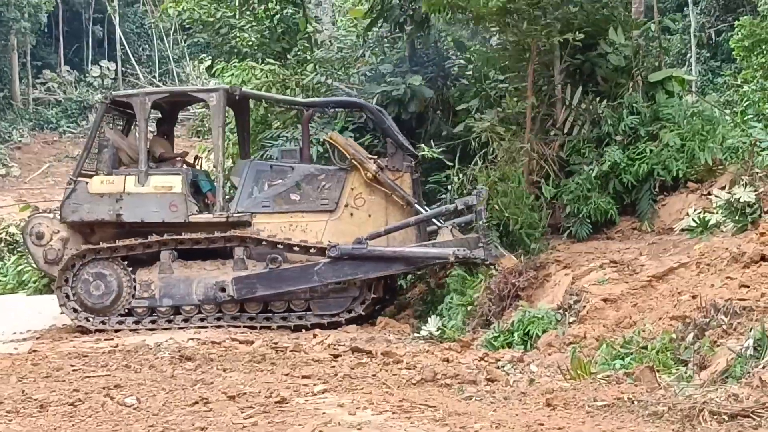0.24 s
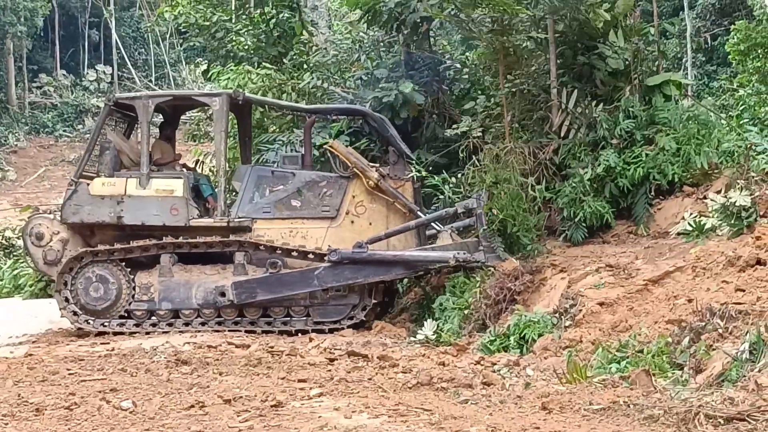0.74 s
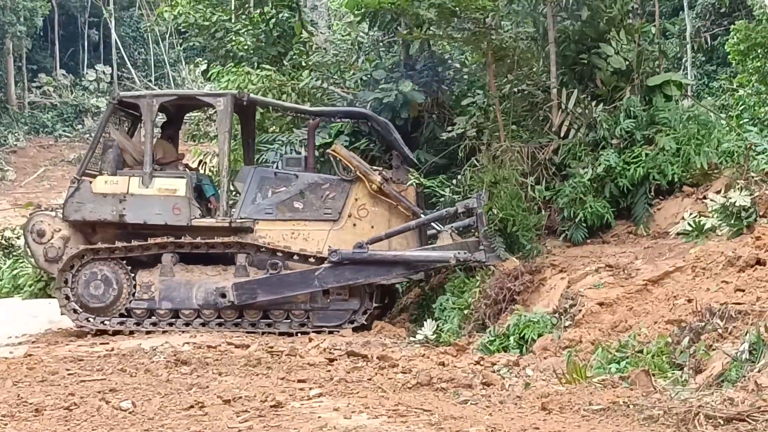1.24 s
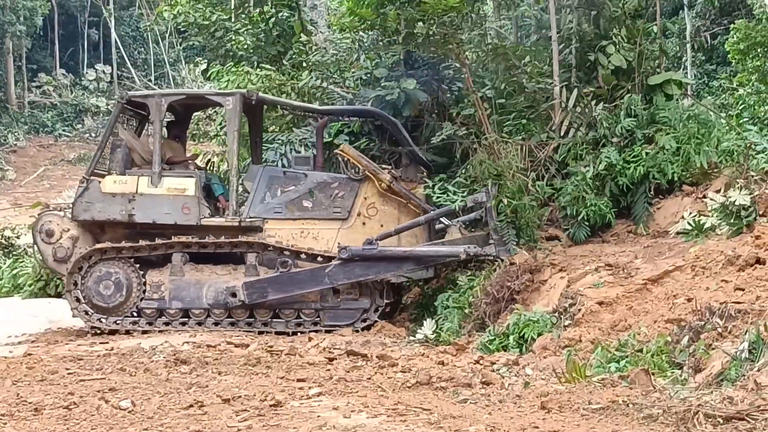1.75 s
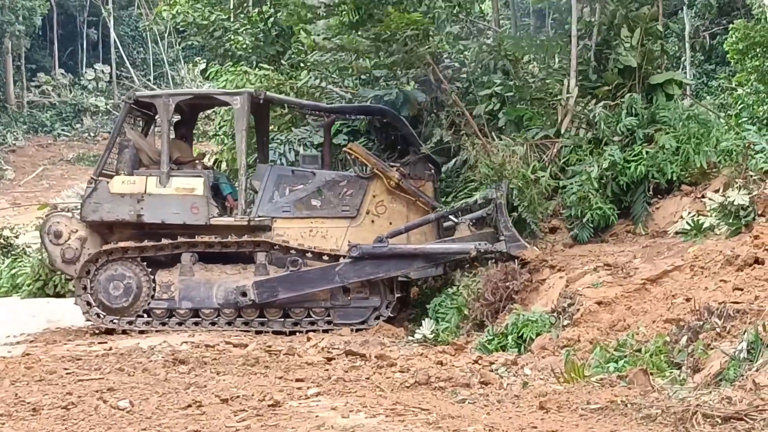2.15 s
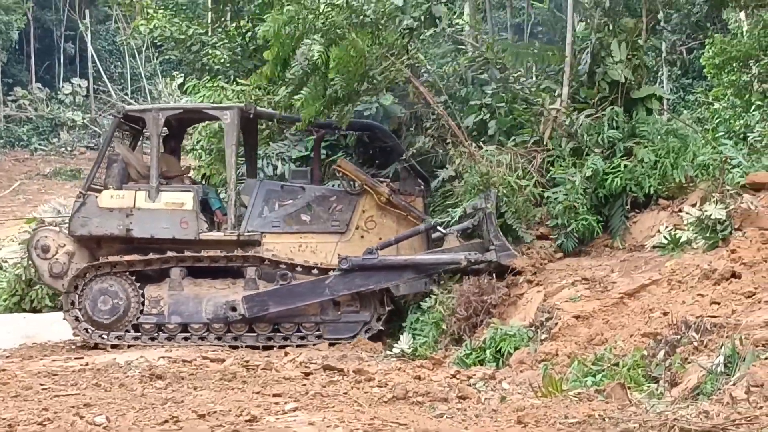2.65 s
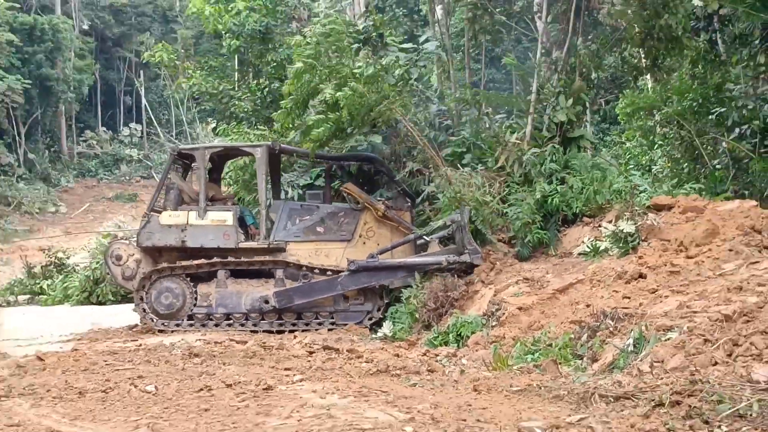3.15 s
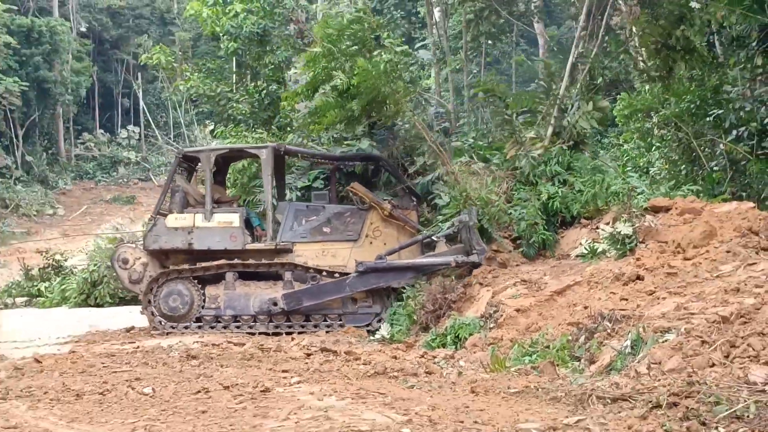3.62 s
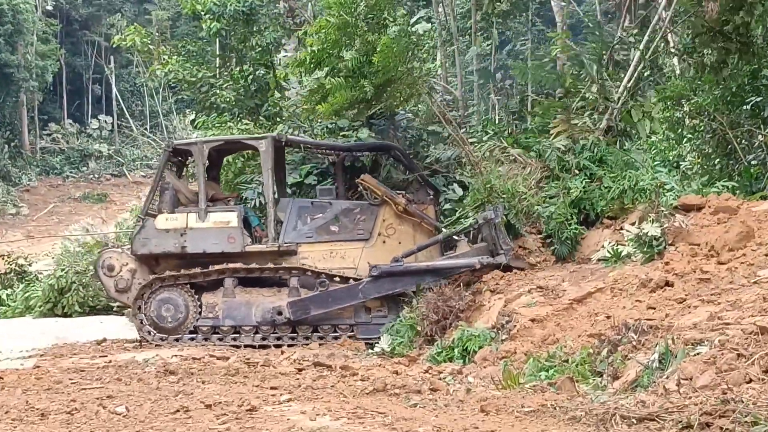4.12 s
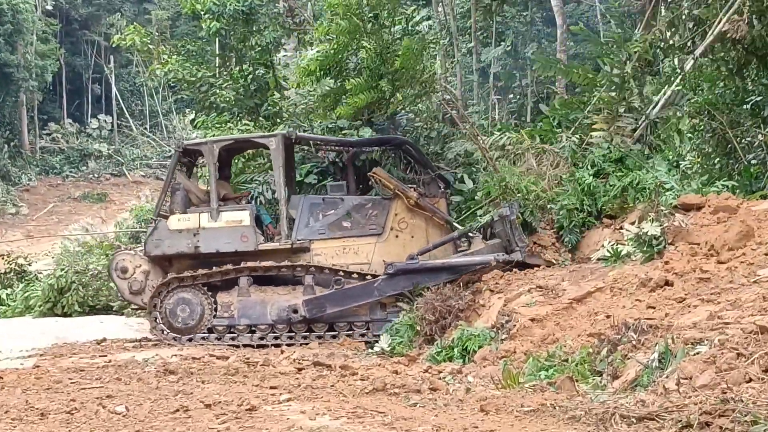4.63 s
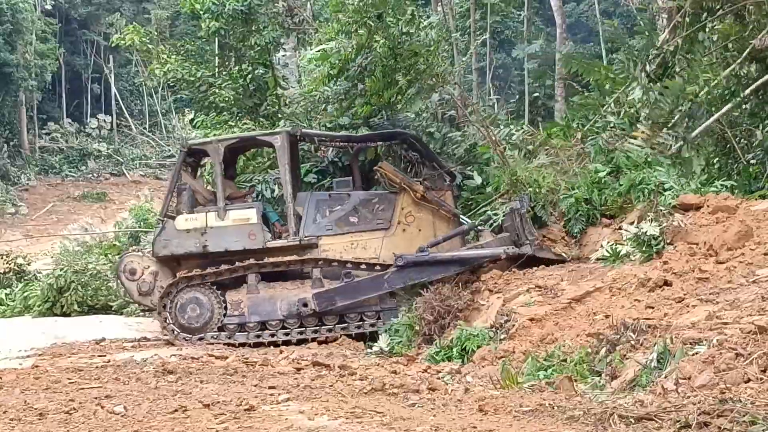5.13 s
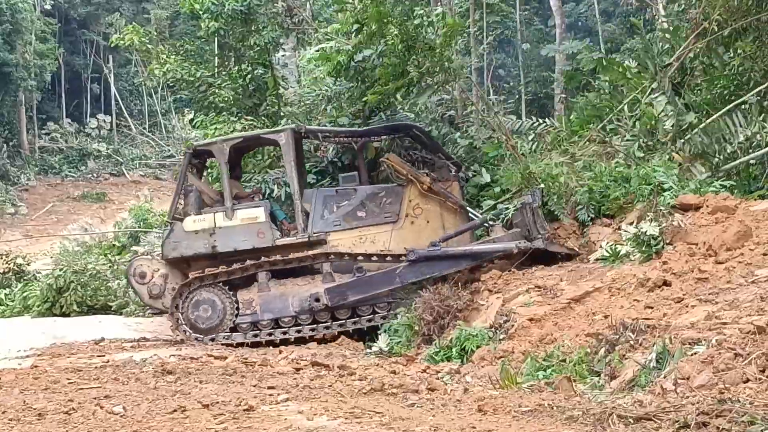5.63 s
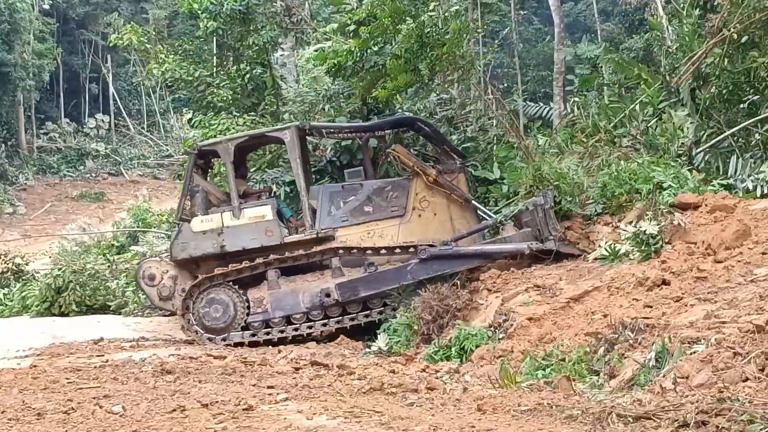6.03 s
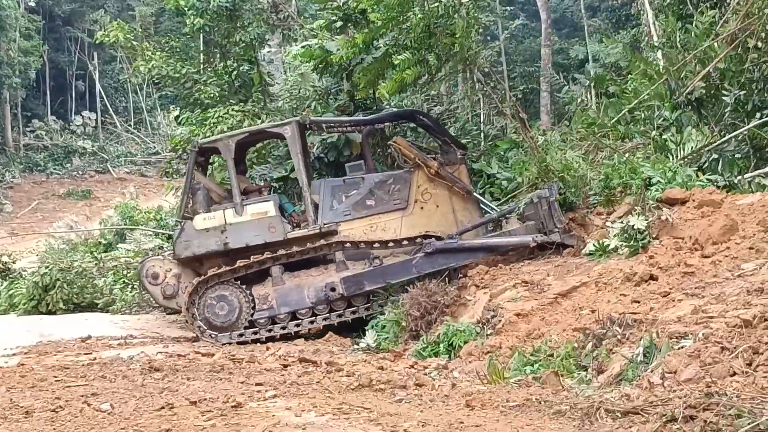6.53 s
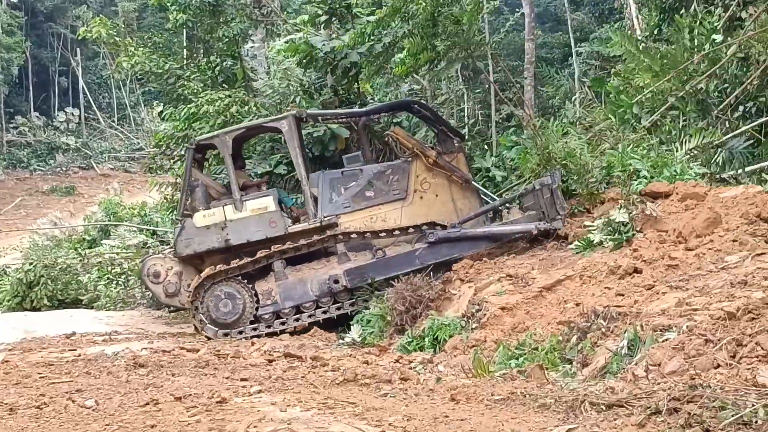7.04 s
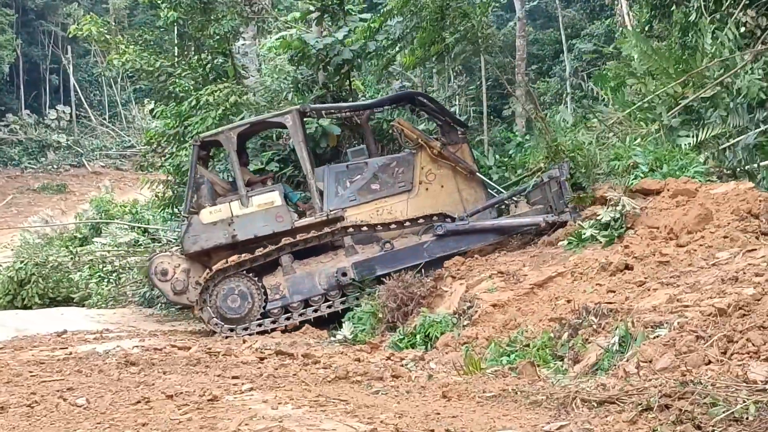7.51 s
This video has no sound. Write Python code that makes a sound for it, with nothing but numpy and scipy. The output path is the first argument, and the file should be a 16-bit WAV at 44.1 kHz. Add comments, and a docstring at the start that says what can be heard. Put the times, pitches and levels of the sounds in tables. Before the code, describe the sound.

At an open earthmoving site, a bulldozer pushes uphill with its engine under constant load. The thick, throbbing drone hardly changes pitch, but its tone wavers as low exhaust notes swell and recede. Over it lie rushing fan noise, fine metallic clatter and a pulsed turbocharger hiss with a very high whine. The small two-channel microphone stands some metres away; the right side is brighter, the left duller in the treble.

```python
"""An earthmoving site: a six-cylinder diesel crawler pushes earth, some metres from a small two-port microphone.
Exhaust and fan orders are sines locked to the crank angle; a wide roar and a block clatter are shaped noise.
The turbocharger adds pulsed hiss and shaft-order whistles, speeding up as load sags the crank.
One port faces the machine; the other is shaded in the treble and partly hears other paths."""
import sys
import numpy as np
from scipy import signal
from scipy.fft import rfft, irfft
from scipy.io import wavfile
from scipy.ndimage import uniform_filter1d, map_coordinates

SR = 44100
rng = np.random.default_rng(int(sys.argv[2]) if len(sys.argv) > 2 else 0)


def transcribe(signal):
    """Save signal, clipped to [-1, 1], as a 16-bit WAV file at the path in sys.argv[1]."""
    frames = np.atleast_2d(signal).T
    limited = np.clip(frames, -1, 1)
    pcm = np.round(limited * 32767).astype(np.int16)
    wavfile.write(sys.argv[1], SR, pcm)


N = 342657
T = np.arange(N) / SR  # s


def gain_of(db):
    """Decibels to amplitude ratio: twenty decibels for each factor of ten."""
    return 10 ** (np.asarray(db) / 20)


def evened(x):
    """Normalization to unit rms."""
    return x / np.sqrt(np.mean(x ** 2) + 1e-20)


def read(points, hz):
    """Linear interpolation of a spectrum on a logarithmic frequency axis."""
    f, value = np.transpose(points)
    return np.interp(np.log(hz + 1), np.log(f + 1), value)


def curves(rows):
    """Linear interpolation in time: one sample-rate curve for each column after the time."""
    s, *columns = np.transpose(rows)
    return [np.interp(T, s, column) for column in columns]


def wander(rate):
    """Slow random modulation of rms 1: a smooth curve through 'rate' random values a second."""
    steps = rng.standard_normal(int(T[-1] * rate) + 4)
    coarse = map_coordinates(steps, [T[::64] * rate], order=3)
    return evened(coarse.repeat(64)[:N])


def tone(turns, db):
    """Phase modulation: a sine of rms level db follows the given turns from a random phase."""
    return np.sqrt(2) * gain_of(db) * np.sin(2 * np.pi * (turns + rng.random()))


def noise(spectrum, outside_db, patchy_db, band, size=1024, strand_db=0.):
    """Inverse short-time Fourier synthesis: two unrelated noises of one spectrum, rms 1 inside band (Hz)."""
    hop = size // 4
    hz, frames = np.fft.rfftfreq(size, 1 / SR), N // hop + 5
    a, b, c, d, patches, strands = rng.standard_normal((frames, len(hz), 6)).T
    # strands are narrow in frequency and long in time; patches are wider and shorter
    strands = uniform_filter1d(strands, size=2, axis=0)
    strands = evened(uniform_filter1d(strands, size=24, axis=1))
    patches = uniform_filter1d(patches, size=6, axis=0)
    patches = evened(uniform_filter1d(patches, size=10, axis=1))
    outside = (hz < spectrum[0][0]) | (hz > spectrum[-1][0])
    shape = gain_of(read(spectrum, hz) + outside_db * outside)
    texture = gain_of(patchy_db * patches + strand_db * strands)
    bins = np.array([a + 1j * b, c + 1j * d]) * shape[:, None] * texture
    pair = signal.istft(bins, nperseg=size, noverlap=size - hop)[1][:, :N]
    in_band = (hz >= band[0]) & (hz < band[1])
    power_share = np.sum(shape[in_band] ** 2) / np.sum(shape ** 2)
    return evened(pair) / np.sqrt(power_share)


def crank_turns():
    """Angle as the integral of rotation rate."""
    # Each row: time in seconds, crank speed in turns per second.
    crank_speed = [(0.0, 26.95), (1.1, 26.97), (1.5, 26.62), (1.75, 26.33), (2.25, 27.28), (2.5, 27.26),
                   (2.85, 26.85), (3.25, 27.28), (3.75, 27.25), (4.25, 27.59), (4.85, 27.57), (5.25, 26.99),
                   (5.75, 27.33), (6.25, 27.53), (7.0, 27.68), (7.77, 27.67)]
    return np.cumsum(curves(crank_speed)[0]) / SR


def firing(depth, uneven):
    """Amplitude modulation at the firing rate, three per crank turn; the cylinders differ over two turns."""
    turns = crank_turns()
    cylinders = sum(np.cos(2 * np.pi * (k * turns + rng.random())) for k in (.5, 1, 1.5, 2))
    puff = np.cos(2 * np.pi * 3 * turns) + .4 * np.cos(2 * np.pi * 6 * turns)
    return evened(np.maximum(1 + depth * puff + uneven * cylinders, .05))


def drone():
    """Order synthesis: exhaust and fan tones at fixed multiples of crank speed, each wavering slowly."""
    # Steady exhaust orders. Each row: multiple of crank speed, level in dB rms, wavering in dB rms.
    exhaust_orders = [(1, -61, 1.5), (1.5, -68, 2), (2, -48, 2), (2.5, -52, 3), (3, -31.5, 1.1),
                      (5, -42, 2), (5.5, -47, 2), (6, -37, 2.5), (6.5, -43, 2), (7.5, -48, 2),
                      (8.5, -48, 2), (9, -43, 2), (10, -44, 2), (14, -46, 2), (16.5, -57, 2), (18, -55, 2),
                      (18.5, -56, 2), (19, -55, 2), (20, -56, 2), (21, -55, 2), (26, -56, 2),
                      (32.5, -55, 2), (33, -54, 2), (37, -56, 2), (38, -56, 2), (40.5, -56, 2)]
    # Six unevenly loaded fan blades. Each row: multiple of fan speed, level in dB rms, wavering in dB rms.
    fan_orders = [(4, -50, 2), (5, -42, 2), (6, -29.8, 1.3), (7, -50, 2), (12, -43, 2), (13, -44, 2),
                  (18, -56, 2)]
    # Changing exhaust orders. Each row: time in seconds, level of the 7th order in dB, of the 8th in dB.
    pipe_levels = [(0.0, -33.5, -34.5), (0.4, -32.5, -35.5), (1.2, -36.5, -35.5), (1.75, -29.5, -42),
                   (2.2, -31, -28), (2.6, -29.5, -44), (3.1, -28.5, -33), (3.7, -31, -39.5),
                   (4.25, -32, -34.5), (4.95, -32.5, -46), (5.5, -30.5, -31), (6.0, -31.5, -47),
                   (6.8, -34.5, -37), (7.5, -28.5, -42)]
    fan_pulley = .8923  # fan turns per crank turn
    turns = crank_turns()
    seventh_db, eighth_db = curves(pipe_levels)
    out = tone(7 * turns, seventh_db + 1.2 * wander(4.))
    out += tone(8 * turns, eighth_db + 1.5 * wander(4.))
    for shaft, orders in ((turns, exhaust_orders), (fan_pulley * turns, fan_orders)):
        for k, db, waver_db in orders:
            out += tone(k * shaft, db + waver_db * wander(2.544))
    return np.array([out, out])


def roar():
    """Turbulence noise of stack and fan, in a spectrum combed by ground reflections."""
    # Spectrum at the facing port. Each row: frequency in Hz, relative level in dB per Hz.
    roar_spectrum = [(20, -34), (38, -32), (48, -42), (68, -7.5), (125, 2), (230, -1), (320, -4),
                     (350, -9.5), (460, -16), (690, -9.5), (790, -17.5), (880, -12.5), (1150, -9.5),
                     (1320, -25)]
    start_db, fade_db_per_s = -30.5, 0.08  # fades as the machine climbs away
    air = noise(roar_spectrum, -35, 0.91, (250, 1300), size=4096, strand_db=1.5)
    return air * gain_of(start_db - fade_db_per_s * T + 0.41 * wander(2.54))


def clatter():
    """Panel resonance under dense knocking of block, valves and tracks, barely pulsed by the firing."""
    # Spectrum at the facing port. Each row: frequency in Hz, relative level in dB per Hz.
    clatter_spectrum = [(1150, -35), (1300, -9), (1450, -6.5), (2000, -7), (2250, -10), (2600, -11.5),
                        (2900, -2.5), (3100, -6.5), (3400, -3.5), (3900, -7), (4300, -14.5), (5000, -16.5),
                        (5800, -26.5), (6600, -55)]
    start_db, fade_db_per_s = -33, 0.1836  # fades as the machine climbs away
    knocking = noise(clatter_spectrum, -40, 0.54, (1300, 6000), size=2048, strand_db=1.5)
    knocking *= gain_of(start_db - fade_db_per_s * T + 0.49 * wander(2.45))
    return knocking * firing(0.027, 0.035)


def turbo():
    """Flow noise and blade tones that share one shaft: the hiss level and the pitches follow its speed."""
    # Each row: time in seconds, turbocharger shaft speed in turns per second.
    shaft_speed = [(0.0, 1198), (0.4, 1225), (1.0, 1239), (1.4, 1243), (1.95, 1281), (2.2, 1257),
                   (2.6, 1231), (3.05, 1244), (3.4, 1228), (4.1, 1212), (4.7, 1191), (5.0, 1194),
                   (5.4, 1211), (5.9, 1209), (6.6, 1184), (7.0, 1175), (7.77, 1167)]
    speed = curves(shaft_speed)[0]
    mean_speed_db, db_per_percent = -46, 0.22
    hiss_db = mean_speed_db + db_per_percent * 100 * (speed / speed.mean() - 1)
    return intake_hiss(hiss_db) + whistles(speed, hiss_db)


def intake_hiss(hiss_db):
    """Turbulence noise of the intake, amplitude-modulated by the cylinders."""
    # Spectrum at the facing port. Each row: frequency in Hz, relative level in dB per Hz.
    hiss_spectrum = [(5800, -12), (7400, -10.5), (7900, -21.5), (8200, -14), (8750, -26), (8980, -46),
                     (9300, -17.5), (10400, -11), (11400, -17.5), (12200, -7.5), (13000, -1.5), (14200, -5),
                     (15200, -8), (15450, -16)]
    hiss = noise(hiss_spectrum, -40, 1.1, (11500, 15500), strand_db=1.5) * gain_of(hiss_db)
    return hiss * firing(.11, .06)


def whistles(speed, hiss_db):
    """Blade tones at multiples of shaft speed, fluttering in moving air and beamed toward the facing port."""
    # Each row: time in seconds, level of the 11th shaft order in dB on the direct path.
    eleventh_level = [(0.0, -50), (1.3, -54), (2.2, -47), (3.15, -52), (3.55, -45), (4.2, -50), (5.0, -59),
                      (6.7, -64), (7.3, -54), (7.77, -50)]
    # Directivity. Each row: amplitude factor, first on the direct path, then on the other paths.
    beam = np.array([[1], [.6]])
    eleventh_db = curves(eleventh_level)[0]
    spin = np.cumsum(speed + 1.9 * wander(60.)) / SR  # shaft turns
    wakes = signal.lfilter([.03], [1, -.97], rng.standard_normal((2, N)))
    paths = np.zeros((2, N))
    for path, wake in zip(paths, wakes):
        path += spells(spin)
        path += tone(11 * spin, eleventh_db + 2.5 * wander(20.))
        # blade wakes blur this tone into a hump
        path += tone(11. * spin, hiss_db - 7.5) * evened(wake)
    return paths * beam


def spells(spin):
    """Gated shaft orders: fainter whistles fade in, hold and fade out."""
    # Each row: start in seconds, length in seconds, multiple of shaft speed, direct-path level in dB rms.
    spell_rows = [(0.0, 0.55, 6, -61), (1.45, 0.9, 6, -55), (3.95, 2.6, 6, -61), (7.1, 0.67, 6.03, -65),
                  (7.1, 0.67, 5.92, -61), (6.7, 1.07, 12.02, -59)]
    edge_s = 0.17
    out = np.zeros(N)
    for start, length, k, db in spell_rows:
        to_nearest_edge = np.minimum(T - start, start + length - T)
        gate = np.clip(to_nearest_edge / edge_s + .5, 0, 1)
        out += gate * tone(k * spin, db + 2.2 * wander(25.))
    return out


def ports(facing, unlike):
    """Partial coherence: the left port mixes a lagged facing signal with other paths, then is shaded."""
    # Shaded port against facing port. Each row: frequency in Hz, level difference in dB.
    shade = [(250, -.2), (400, .3), (690, -2.5), (880, 1.5), (1150, -2.5), (1400, 2.5), (2000, 0),
             (3900, -7), (5200, -8), (5900, -2), (7500, -6), (8900, 2.5), (10200, -16), (15000, -21),
             (15300, -30)]
    # Each row: frequency in Hz, likeness of the two ports from 0 to 1.
    likeness = [(200, .9995), (330, .97), (450, .9), (620, .95), (780, .82), (1180, .95), (1320, .4),
                (1450, .65), (1720, .1), (2050, .6), (2600, .25), (2900, .62), (4100, .68), (5000, .2),
                (14000, .3)]
    # Each row: frequency in Hz, phase lag in radians.
    lag = [(600, 0), (1200, .05), (1700, -.5), (1900, 1.6), (4500, .8), (5200, 3.3), (6200, 4.5),
           (7000, 2.4), (7800, -.2), (8800, 2.9), (10200, .9), (11000, -1.2), (15000, -2.1)]
    hz = np.fft.rfftfreq(N, 1 / SR)
    same = np.clip(read(likeness, hz), 0, 1)
    left = same * np.exp(-1j * read(lag, hz)) * rfft(facing)
    left += np.sqrt(1 - same ** 2) * rfft(unlike)
    shaded = irfft(left * gain_of(read(shade, hz)), N)
    return np.array([shaded, facing])


def scene():
    """Superposition of all the machine's sources, heard by both ports."""
    direct, other_paths = drone() + roar() + clatter() + turbo()
    return ports(direct, other_paths)


def record(dry):
    """Band limitation by a linear-phase low-pass filter."""
    edge_hz = 15480
    lowpass = signal.firwin(511, edge_hz, window=("kaiser", 9), fs=SR)
    return signal.oaconvolve(dry, lowpass[None], "same")


dry = scene()
out = record(dry)
transcribe(out)
```